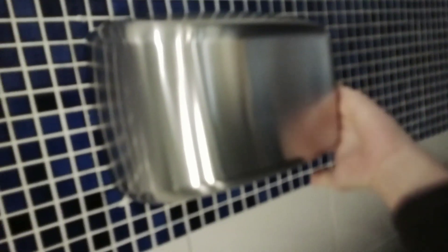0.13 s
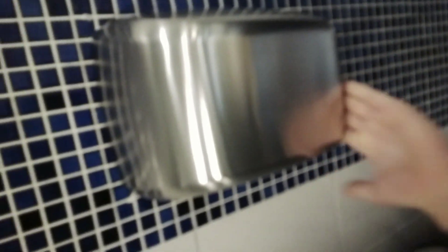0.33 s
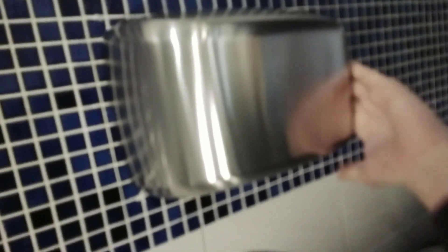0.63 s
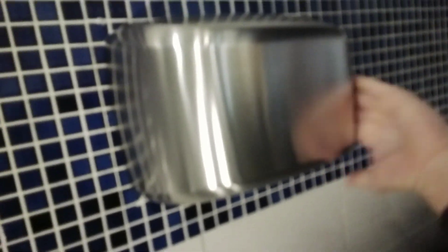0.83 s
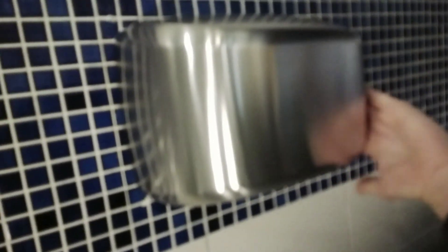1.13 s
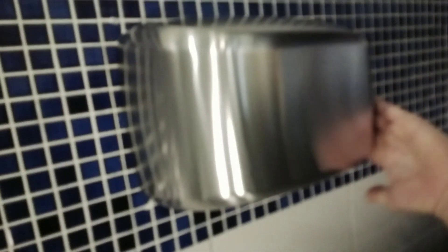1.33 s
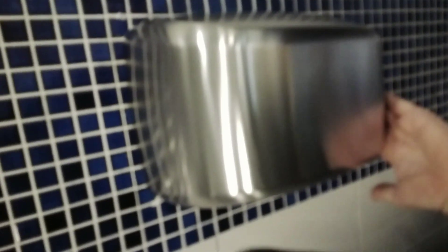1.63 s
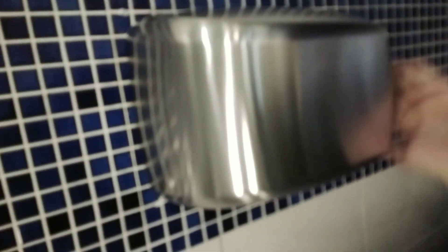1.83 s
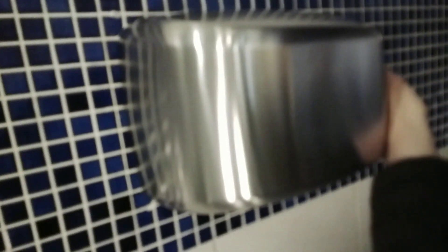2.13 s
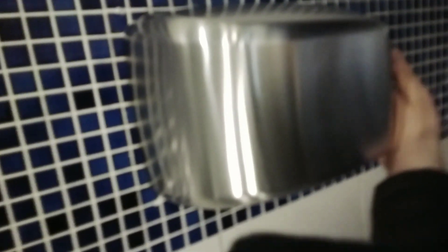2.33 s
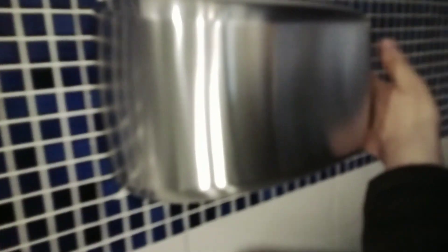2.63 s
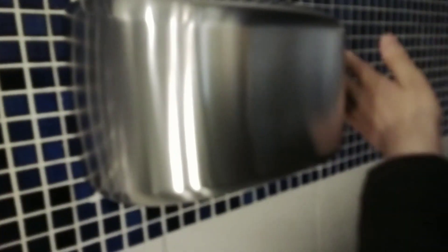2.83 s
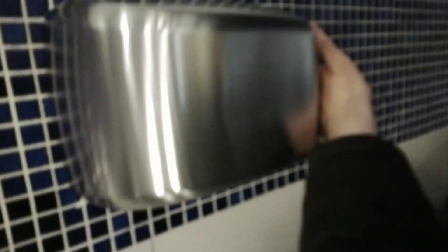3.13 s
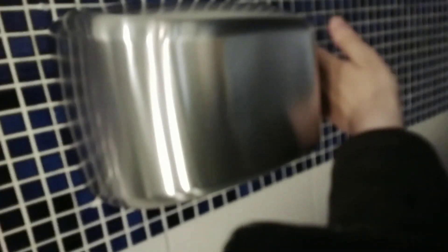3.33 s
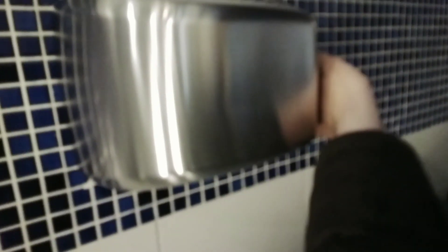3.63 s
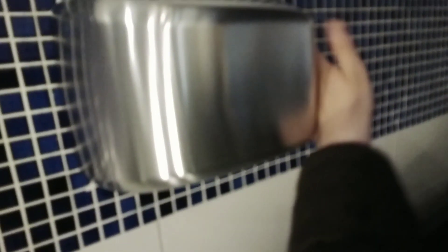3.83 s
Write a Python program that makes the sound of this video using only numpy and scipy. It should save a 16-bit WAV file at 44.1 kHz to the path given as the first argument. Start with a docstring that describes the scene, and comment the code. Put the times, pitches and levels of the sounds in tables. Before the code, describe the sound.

A hand dryer blows close by in a tiled washroom, with uneven hissing swells, low buffets and brief scrapes as a hand crosses the air. At about 1.9 seconds the motor cuts out and coasts down. At 2.7 seconds it clicks on with a shudder and rising whoosh, reaching a much louder, steady rush over an electric hum by 3 seconds. A low drone joins from 3.6 seconds.

```python
"""A tiled washroom, close to a steel hand dryer, in mono.
A hand dips in and out of the turbulent jet, with swells of spray, low buffets and brief scrapes; the
motor cuts out and coasts. A relay clicks, the casing shudders and the fan whooshes up to a loud rush
over mains hum, and the air under the hand starts to drone. The rushing air is broadband noise, coloured
by the resonances of the housing and reflected by the tiles."""
import sys
import numpy as np
from scipy import signal
from scipy.fft import rfft, irfft
from scipy.io import wavfile
from scipy.ndimage import uniform_filter1d

SR = 44100
rng = np.random.default_rng(int(sys.argv[2]) if len(sys.argv) > 2 else 0)


def store_wav(level_fs):
    """Save 16-bit WAV to argv[1]."""
    pcm = np.round(np.clip(np.atleast_2d(level_fs), -1, 1) * 32767)
    wavfile.write(sys.argv[1], SR, pcm.T.astype(np.int16))


N = 176400
T = np.arange(N) / SR
FRAME_S = np.arange(N // 256 + 5)[:, None] * 256 / SR
BIN_HZ = np.fft.rfftfreq(1024, 1 / SR) + 1
CUT_S, RELAY_S = 1.88, 2.7  # motor off, motor on again

# All table levels are relative. Mains hum. Each row: time in seconds, level in dB.
HUM_LEVELS = [(0, -55.5), (1.8, -54), (1.95, -56), (2.05, -107), (2.7, -74), (2.735, -32), (2.8, -34),
              (2.88, -40), (2.97, -34.5), (3.5, -37.5), (4, -47)]
# The rotor running down. Each row: time in seconds, pitch in Hz, level in dB.
ROTOR_GLIDE = [(2.02, 107.5, -66), (2.12, 95.6, -57.5), (2.3, 78, -63), (2.38, 72, -72), (2.47, 63, -52),
               (2.56, 57, -76)]
# Modes of the relay. Each row: frequency in Hz, level in dB, seconds to decay by 60 dB.
RELAY_MODES = [(6500, -2.5, 0.083), (7930, -7, .2), (8300, -3.5, 0.41), (9240, -2, 0.09),
               (10500, -9.5, .07), (11740, -9, 0.054), (12600, -8, .085)]
# Whistle at the nozzle lip. Each row: time in seconds, level in dB.
WHISTLE_LEVELS = [(2.75, -67), (2.78, -47), (2.82, -51), (2.85, -66), (2.89, -38.5), (3.0, -44), (3.2, -37)]
# The fan gaining speed. Each row: time in seconds, resonance in Hz, level in dB.
WHOOSH_GLIDE = [(2.705, 510, -53), (2.73, 662, -47.5), (2.769, 868, -38), (2.807, 963, -28),
                (2.834, 1005, -44), (2.9, 1010, -54)]
# Drones under the hand. Each row: start and end in seconds, first and last level in dB.
DRONE_SPANS = [(.13, 0.265, -45.5, -43.5), (1.523, 1.625, -40.5, -40), (3.632, 4.05, -26, -17.5)]
# Low buffets of air, with a few brief, higher scrapes and a faint scuff.
# Each row: start and hold in seconds, level in dB, pitch and width in Hz.
BUFFETS_AND_SCRAPES = [(0, 0.039, -30.5, 239, 118), (0.628, 0.011, -35, 244, 168),
                       (0.655, 0.029, -35.5, 274, 110), (.815, 0.028, -39.5, 585, 255),
                       (0.839, 0.025, -32.5, 218, 131), (.872, 0.034, -34, 252, 133),
                       (1.029, 0.0033, -35.5, 1490, 700), (1.105, 0.02, -40, 284, 110),
                       (1.247, 0.018, -37.5, 703, 450), (1.254, 0.0045, -40, 1960, 705),
                       (1.258, 0.045, -33, 293.3, 77), (1.319, 0.023, -35.5, 243, 163),
                       (1.375, 0.042, -38, 260, 198), (1.416, 0.0081, -36.5, 1256, 814),
                       (1.497, 0.023, -38, 668, 600), (1.509, 0.077, -37, 261.7, 147.7),
                       (1.939, 0.1, -42.5, 293, 44.7), (2.449, 0.091, -55.5, 1600, 600),
                       (2.87, 0.029, -31.5, 283, 60), (3.613, .022, -20, 275, 163),
                       (3.828, .045, -24, 276, 35)]
# Resonances of the steel housing and nozzle. Each row: frequency and width in Hz, lift in dB.
HOUSING_MODES = [(281, 45, 5), (670, 88, 3.5), (1003, 48, 4), (1462, 133, 5), (1704, 63, 4.5),
                 (1890, 66, 2.5), (2036, 97, 6.5), (2670, 106, 4.5), (3025, 110, 4.5), (3280, 120, 4),
                 (3490, 83, 1.5), (5850, 340, 1.5), (8220, 1050, 2.5)]
# Spectrum of the free jet. Each row: frequency in Hz, level in dB.
JET_SPECTRUM = [(25, -32), (60, -14), (130, -0.5), (280, 5), (390, -4.5), (680, 1.5), (1200, -6),
                (2000, -6.5), (2500, -10.5), (4600, -9.5), (6000, -8), (8400, -7), (10500, -12.5),
                (13500, -20), (16000, -21)]
# Decay of the jet as the fan coasts. Each row: frequency in Hz, decay in dB per second.
COAST_DECAY = [(60, 6), (300, 25.5), (700, 22), (2000, 23.5), (4000, 22.5), (8000, 24.5), (11000, 27),
               (16000, 29)]
# The hand crossing the jet. Each row: middle and half length in seconds, roar level in dB,
# roar centre in Hz, hiss level in dB, hiss centre in Hz.
HAND_PASSES = [(0.201, 0.027, -44, 3000, -37, 8200), (0.254, 0.041, -34.5, 3250, -47, 7000),
               (0.305, 0.043, -37.5, 2030, -48, 8440), (0.558, 0.04, -37, 2290, -37, 6000),
               (0.623, 0.011, -40.5, 1900, -52, 9000), (0.763, 0.021, -36.5, 2040, -37.5, 6250),
               (0.822, .035, -40.5, 2170, -45, 8800), (0.989, 0.048, -37, 2000, -41.5, 8900),
               (1.202, 0.041, -35.5, 2220, -37.5, 8500), (1.396, 0.036, -38, 1830, -39, 7100),
               (1.573, 0.031, -32.5, 3220, -36, 7130), (1.588, 0.043, -34, 1990, -48, 9000),
               (1.69, 0.077, -41.5, 2330, -45, 8400), (1.922, 0.044, -40, 694, -60, 7860)]
# Thin spray common to all passes. Each row: frequency in Hz, level in dB.
SPRAY_SPECTRUM = [(100, -50), (700, -35), (4500, -40.5), (10500, -39), (14500, -59), (15700, -41)]
# Course of the full rush. Each row: time in seconds, hiss level in dB, roar level in dB.
RUSH_LEVELS = [(2.76, -48, -43.5), (2.808, -40, -35), (2.834, -39, -35), (2.98, -25.5, -26),
               (3.108, -24.5, -27.5), (3.266, -29.5, -22.5), (3.402, -25.5, -25.5), (3.606, -27.5, -23),
               (3.636, -24.5, -22), (3.772, -26.5, -25), (3.854, -24.5, -22), (3.94, -25.5, -22),
               (4.0, -27.5, -21)]
# Spectra of the full rush's hiss and roar. Each row: frequency in Hz, level in dB.
HISS_SPECTRUM = [(300, -10.5), (900, -11), (1300, -4), (1900, -1), (2350, -3), (3000, -1.5), (4000, -5),
                 (4800, -6), (6200, -1), (8400, 0), (9700, -3), (11500, -9), (14000, -12.5), (16000, -13)]
ROAR_SPECTRUM = [(25, -35), (60, -24), (130, 0.5), (200, -0.5), (285, 4), (370, -8), (520, -0.5),
                 (680, -3.5), (830, -5), (1050, -6.5), (1400, -15), (3000, -42), (8000, -50)]


def amp(db):
    """Amplitude grows tenfold for every 20 dB."""
    return 10 ** (np.asarray(db) / 20)


def unit(x):
    """Normalisation to an rms of 1."""
    return x / np.sqrt(np.mean(abs(x) ** 2) + 1e-20)


def on_bins(points):
    """Interpolation of a spectrum along a logarithmic frequency axis."""
    hz, value = np.transpose(points)
    return np.interp(np.log(BIN_HZ), np.log(hz), value)


def wander(rate_hz, size=N):
    """Low-passed noise: a random fluctuation of rms 1."""
    hz = np.fft.rfftfreq(size, 1 / SR)
    return unit(irfft(rfft(rng.standard_normal(size)) / (1 + (hz / rate_hz) ** 4), size))


def noise_band(hz, width_hz, size=N):
    """Random quadrature modulation spreads a carrier into a band of noise."""
    phase = 2 * np.pi * np.cumsum(hz * np.ones(size)) / SR
    return wander(width_hz / 2, size) * np.cos(phase) + wander(width_hz / 2, size) * np.sin(phase)


def tone(hz):
    """A sine of rms 1 whose phase is the integral of its frequency."""
    return np.sqrt(2) * np.sin(2 * np.pi * (np.cumsum(hz * np.ones(N)) / SR + rng.random()))


def hump(centre_hz, below_octaves, above_octaves):
    """An asymmetric spectral peak of unit power."""
    octaves = np.log2(BIN_HZ / centre_hz)
    return unit(1 / (1 + (octaves / np.where(octaves < 0, below_octaves, above_octaves)) ** 2) ** 2)


def turbulence(gain, eddy_db, flutter_db, flutter_hz):
    """Source and filter: eddies modulate air noise, shaped by gain and the housing's resonances."""
    real, imag, eddies = rng.standard_normal((3, len(FRAME_S), len(BIN_HZ)))
    eddies = unit(uniform_filter1d(uniform_filter1d(eddies, size=8, axis=0), size=12, axis=1))
    housing_db = sum(db / (1 + (2 * (BIN_HZ - hz) / width) ** 2) for hz, width, db in HOUSING_MODES)
    source = (real + 1j * imag) * unit(amp(eddy_db * eddies))
    spectra = np.array([source, source * gain * unit(amp(housing_db))])
    plain, shaped = signal.istft(spectra, nperseg=1024, noverlap=768, time_axis=1, freq_axis=2)[1][:, :N]
    return shaped / plain.std() * unit(amp(flutter_db * wander(flutter_hz)))


def washroom(direct, t60_s=0.3, reverb_db=-4):
    """Reverberation: dense midrange reflections off the tiles decay exponentially."""
    t = T[:SR // 2]
    tail = rng.standard_normal(len(t)) * amp(-60 * t / t60_s) * (t > 0.003)
    midrange = signal.butter(1, [400, 2800], "band", fs=SR, output="sos")
    tail = signal.sosfilt(midrange, tail / np.linalg.norm(tail))
    return direct + amp(reverb_db) * signal.fftconvolve(direct, tail)[:N]


def motor(hum_hz=100.9):
    """Forced vibration: mains hum under power, and a tone that sinks with the coasting rotor's speed."""
    times, hz, db = np.transpose(ROTOR_GLIDE)
    rotor = np.interp(T, times, amp(db), left=0, right=0) * tone(np.interp(T, times, hz))
    hum_db = np.interp(T, *np.transpose(HUM_LEVELS)) + 1.1 * wander(2.8)
    return rotor + amp(hum_db) * tone(hum_hz)


def shudder(peak_s=0.076):
    """Transient response: the motor's starting torque gives the casing a low, rough shake."""
    progress = np.maximum(T - RELAY_S, 0) / peak_s
    envelope = (progress * np.exp(1 - progress)) ** 2
    return amp(-38) * envelope * noise_band(hz=126.3, width_hz=170)


def relay():
    """Impact excitation: the relay closes with a broadband click and its damped modes ring."""
    age = np.maximum(T - RELAY_S, 0)
    ring = sum(amp(db - 60 * age / t60) * noise_band(hz, width_hz=700) for hz, db, t60 in RELAY_MODES)
    click = amp(-0.5) * np.exp(-age / 0.013) * noise_band(hz=10500, width_hz=9000)
    return amp(-40) * (age > 0) * (ring + click)


def fan_whoosh(width_hz=310, step_db=-6.5):
    """Four harmonically related noise bands climb with the speed of the fan."""
    times, hz, db = np.transpose(WHOOSH_GLIDE)
    pitch = np.interp(T, times, hz)
    bands = sum(amp(step_db * (k - 1)) * noise_band(pitch * k, width_hz * k) for k in range(1, 5))
    return np.interp(T, times, amp(db), left=0, right=0) * bands


def nozzle_whistle(pitch_hz=2590, jitter_hz=25):
    """An edge tone: air passing the nozzle lip whistles briefly."""
    times, db = np.transpose(WHISTLE_LEVELS)
    return np.interp(T, times, amp(db), left=0, right=0) * tone(pitch_hz + jitter_hz * wander(62))


def drone(pitch_hz=136.1, fade_s=0.11):
    """Self-sustained oscillation: air between hand and nozzle locks into a low note and its octave."""
    level = 0
    for start, end, first_db, last_db in DRONE_SPANS:
        fade = np.clip(np.minimum(T - start, end - T) / fade_s + 0.5, 0, 1)
        level += amp(np.interp(T, [start, end], [first_db, last_db])) * fade
    hz = pitch_hz * (1 + 0.0026 * wander(22))
    return level * (tone(hz) + amp(-14.5) * tone(2 * hz))


def buffets_and_scrapes(rise_s=0.0023, fall_s=0.021):
    """Damped bursts of band noise: low buffets of air, a few brief, higher scrapes and a faint scuff."""
    out, t = np.zeros(N), T[:SR // 3]
    for start, hold, db, hz, width in BUFFETS_AND_SCRAPES:
        envelope = np.minimum(t / rise_s, 1) * np.exp(-np.maximum(t - hold, 0) / fall_s)
        core = noise_band(hz, width, len(t))
        skirt = amp(-15) * noise_band(hz + width, 4.2 * width, len(t))
        bass = amp(-25.5) * noise_band(hz=65, width_hz=35, size=len(t))
        burst = envelope * (core + skirt + bass)
        burst *= amp(db) * np.linalg.norm(envelope) / np.linalg.norm(burst)
        span = out[round(start * SR):][:len(t)]
        span += burst[:len(span)]
    return out


def free_jet(rise_db=2):
    """Turbulent mixing noise grows slightly until the cut, then decays, the deep bass most slowly."""
    level_db = -38.5 - rise_db * np.maximum(1 - FRAME_S / CUT_S, 0)
    decay_db = np.maximum(FRAME_S - CUT_S, 0) * on_bins(COAST_DECAY)
    gain = unit(amp(on_bins(JET_SPECTRUM))) * amp(level_db - decay_db)
    return turbulence(gain, eddy_db=1.5, flutter_db=0.36, flutter_hz=25)


def hand_spray(steepness=2.46):
    """The hand splits the jet into roar, hiss and thin spray; being incoherent, they add in power."""
    spray = amp(on_bins(SPRAY_SPECTRUM))
    power = 0
    for middle, half_length, roar_db, roar_hz, hiss_db, hiss_hz in HAND_PASSES:
        roar = amp(roar_db) * hump(roar_hz, below_octaves=0.73, above_octaves=0.99)
        hiss = amp(hiss_db) * hump(hiss_hz, below_octaves=0.89, above_octaves=0.71)
        swell = np.exp(-abs((FRAME_S - middle) / half_length) ** steepness)
        power += (roar ** 2 + hiss ** 2 + spray ** 2) * swell
    return turbulence(np.sqrt(power), eddy_db=3.5, flutter_db=1.44, flutter_hz=55)


def full_rush(body_hz=4760, lag_db=-3.5, caught_up_s=2.96):
    """Turbulence in the restarted jet radiates a bright hiss over an uneven low roar."""
    times, hiss_db, roar_db = np.transpose(RUSH_LEVELS)
    onset = np.clip((FRAME_S - RELAY_S) / 0.077, 0, 1)
    hiss_gain = onset * amp(np.interp(FRAME_S, times, hiss_db) + 3) * unit(amp(on_bins(HISS_SPECTRUM)))
    roar_gain = onset * amp(np.interp(FRAME_S, times, roar_db) - 0.9) * unit(amp(on_bins(ROAR_SPECTRUM)))
    # The body of the hiss builds later than its top.
    lagging = np.clip((caught_up_s - FRAME_S) / 0.053, 0, 1)
    hiss_gain *= amp(lag_db * lagging / (1 + (BIN_HZ / body_hz) ** 20))
    hiss = turbulence(hiss_gain, eddy_db=1.4, flutter_db=0.37, flutter_hz=60)
    roar = turbulence(roar_gain, eddy_db=0.15, flutter_db=1.04, flutter_hz=49.1)
    return hiss + roar


def scene():
    """Superposition: the rushing air reverberates, while the other sounds arrive directly."""
    air = amp(-1.53) * washroom(free_jet() + hand_spray() + full_rush())
    mono = air + fan_whoosh() + nozzle_whistle() + relay() + buffets_and_scrapes()
    mono += motor() + shudder() + drone()
    return np.array([mono, mono])


def record(dry, cutoff_hz=15800):
    """Band limiting: a linear-phase low-pass filter removes the highest treble."""
    lowpass = signal.firwin(511, cutoff_hz, window=("kaiser", 9), fs=SR)
    return signal.oaconvolve(dry, lowpass[None], "same")


dry = scene()
out = record(dry)
store_wav(out)
```